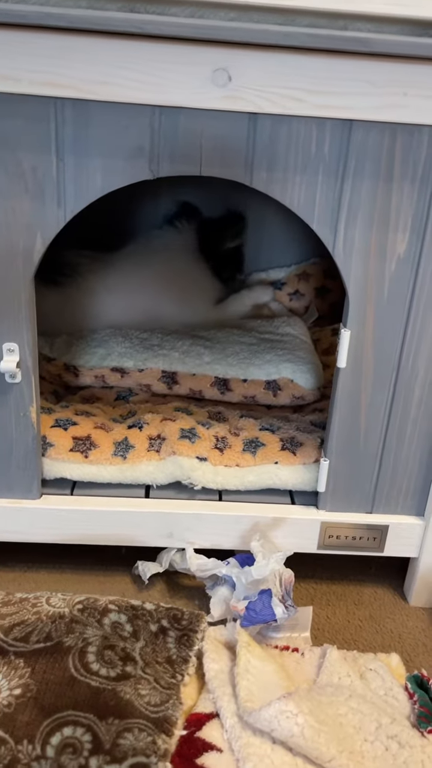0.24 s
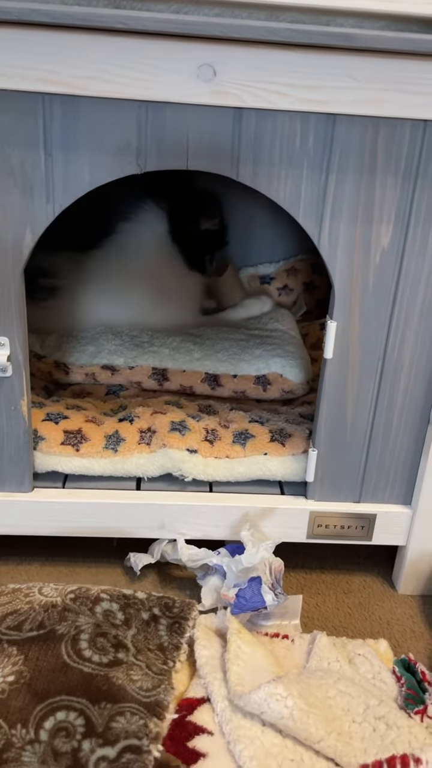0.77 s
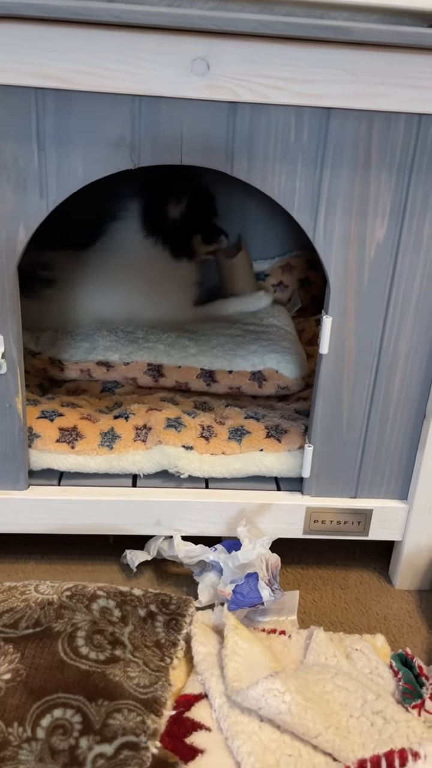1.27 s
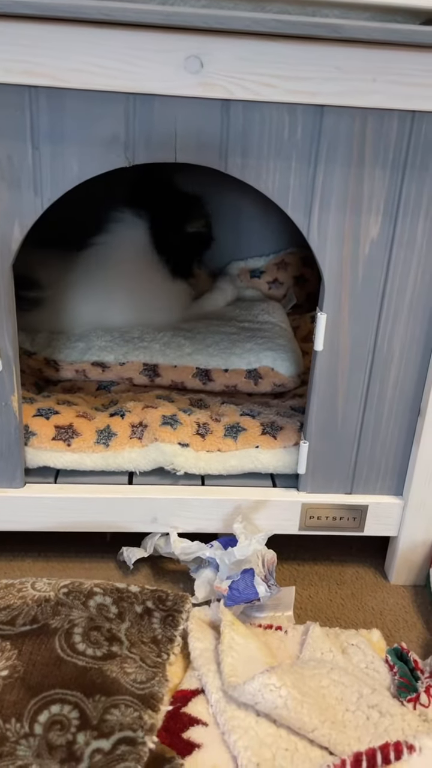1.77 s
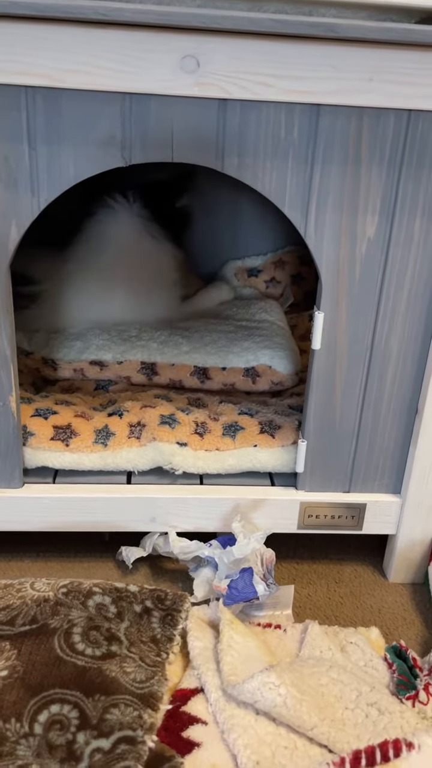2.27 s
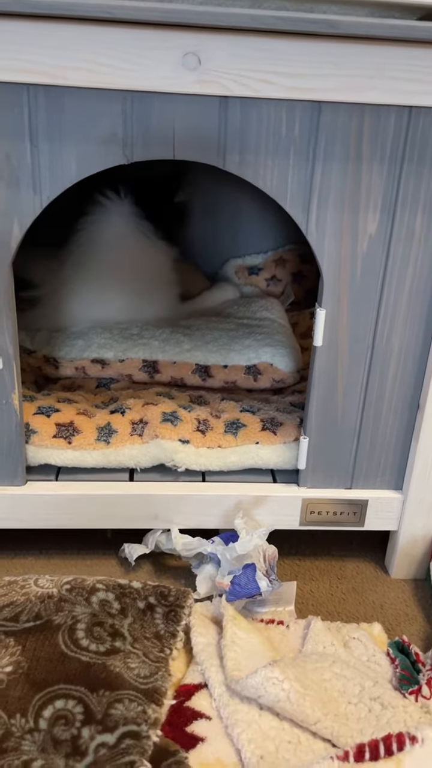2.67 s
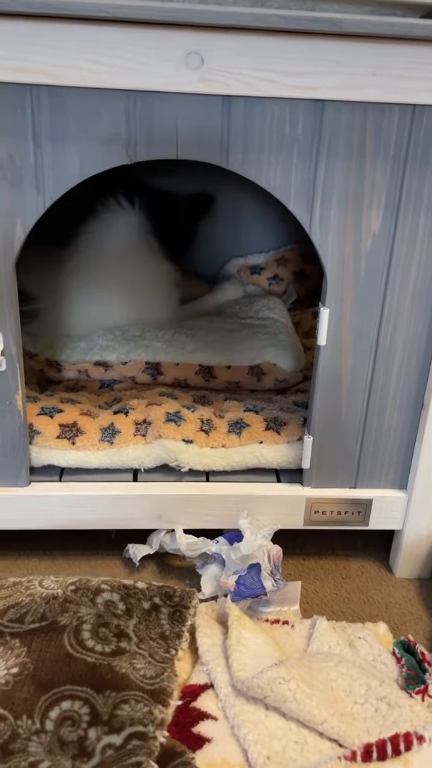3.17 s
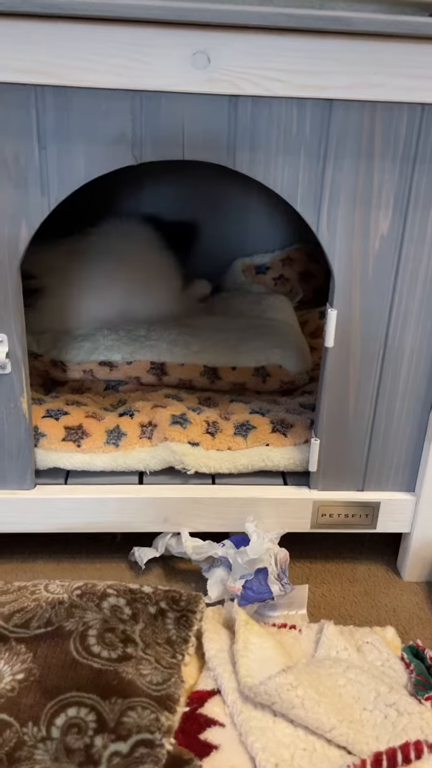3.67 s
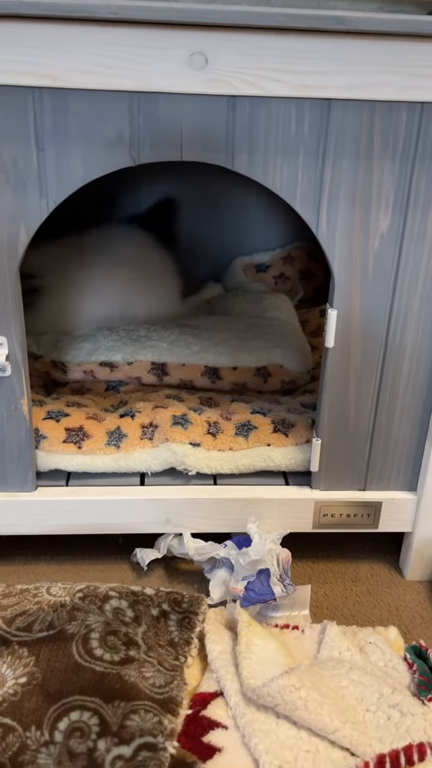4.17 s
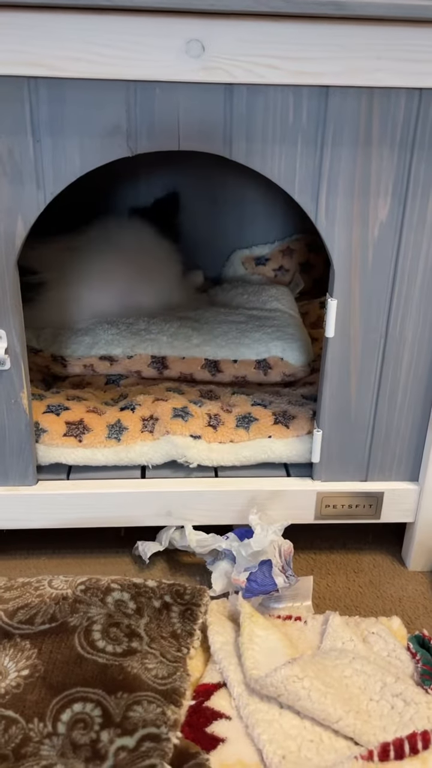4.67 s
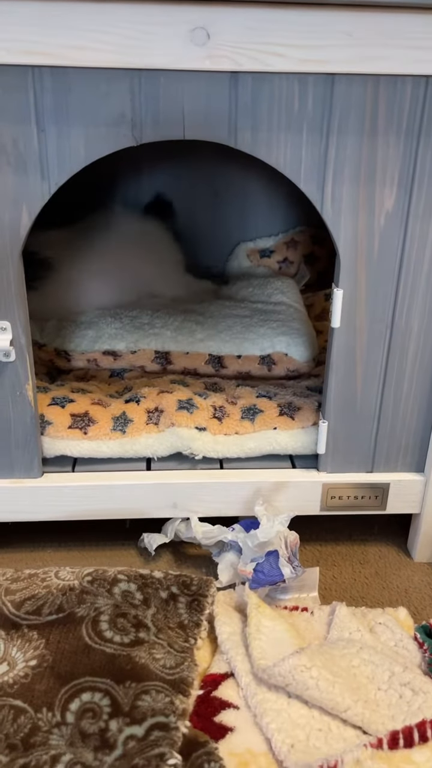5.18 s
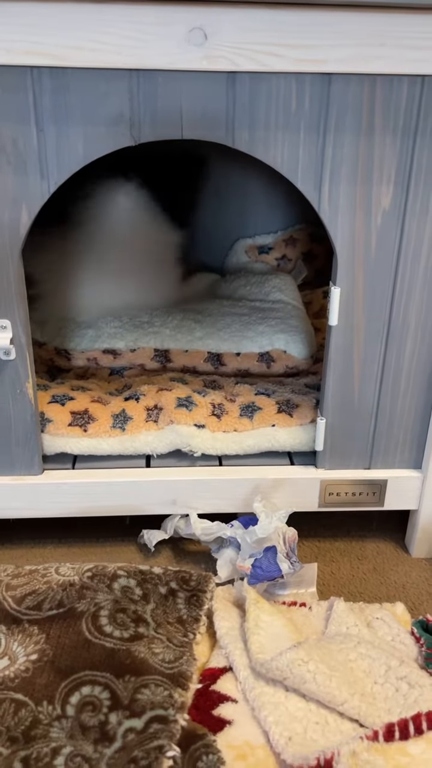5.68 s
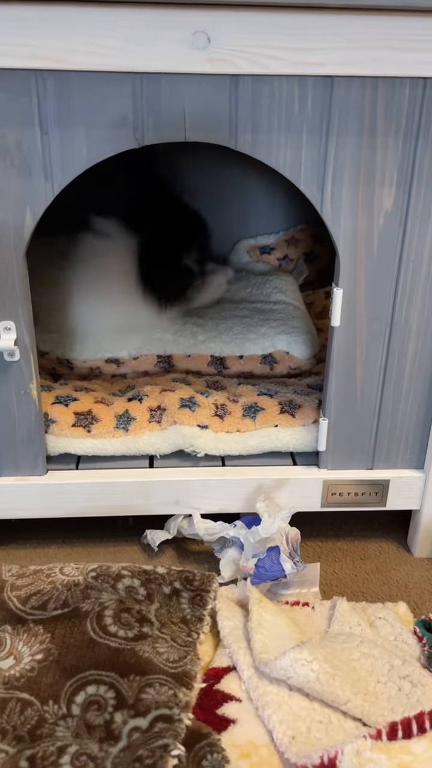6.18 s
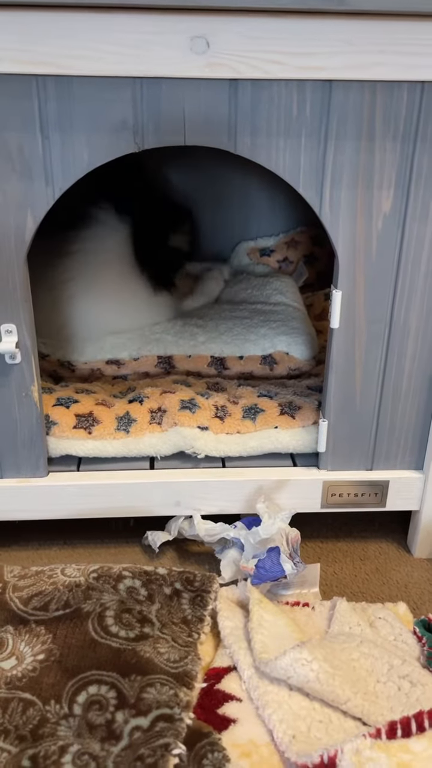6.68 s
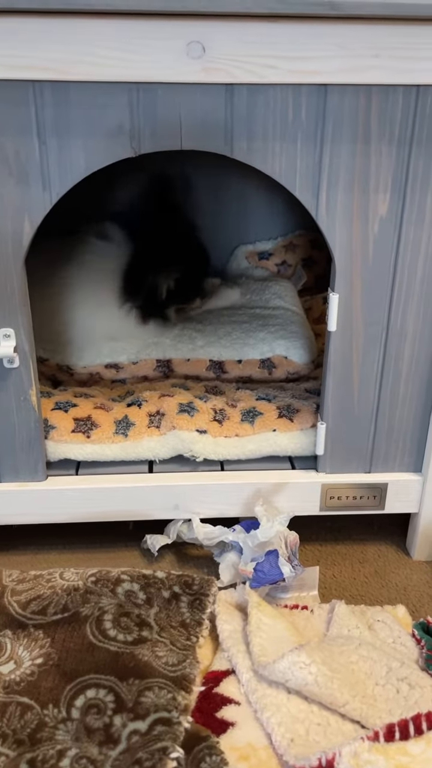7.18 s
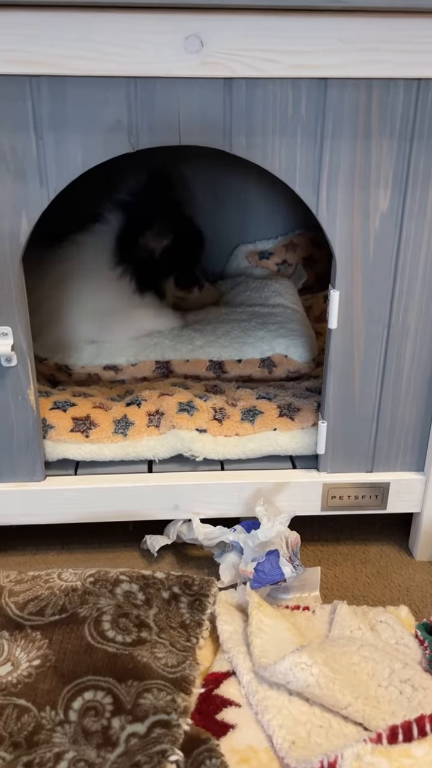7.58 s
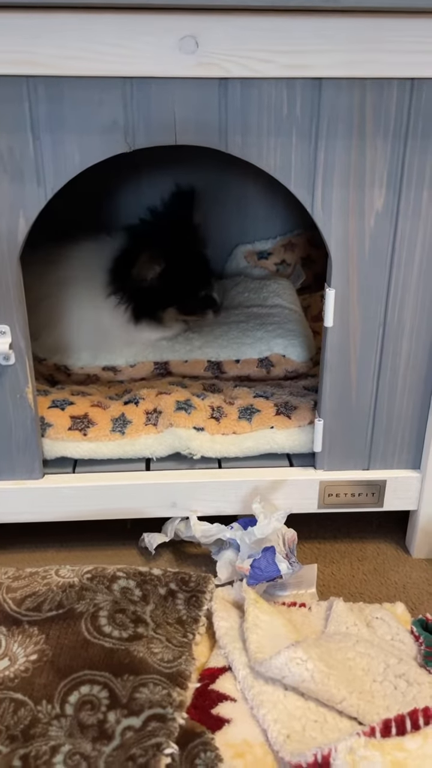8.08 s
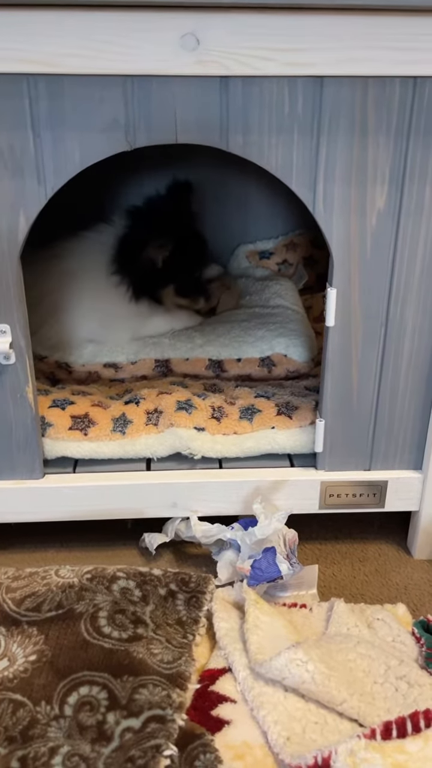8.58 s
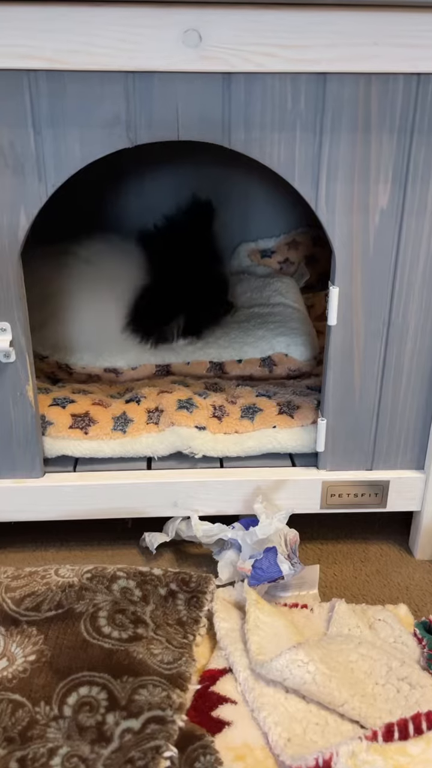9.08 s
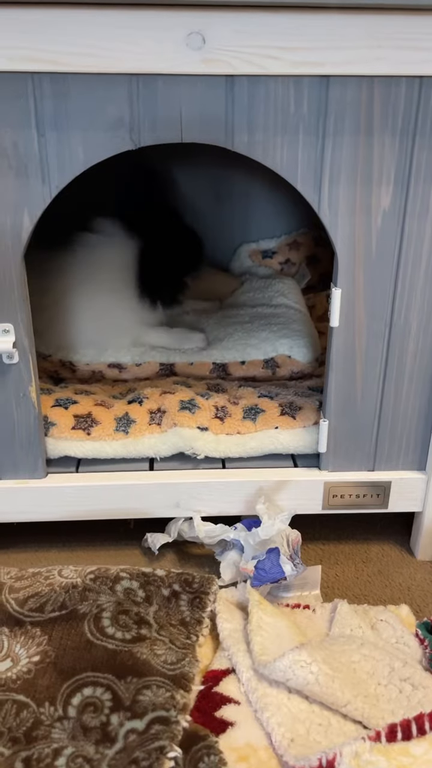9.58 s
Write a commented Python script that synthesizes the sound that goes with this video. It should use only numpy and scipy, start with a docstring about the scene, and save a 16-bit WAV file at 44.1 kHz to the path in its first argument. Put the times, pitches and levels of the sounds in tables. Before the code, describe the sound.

Dry crinkling, tearing and crunching come in irregular bursts as a small dog bites through a cardboard tube in a wooden kennel indoors. After a short lull the snaps grow more frequent, joined by soft low thuds from its body, a brief bump of a hand on the microphone and a couple of very faint squeaks. The sound is fairly close, over a steady low hum.

```python
"""A small dog chews a cardboard tube, lying on cushions in a wooden kennel a metre from a phone.
Paper fibres tear in dense crackle, teeth snap through the wall and the air in the tube rings.
The body thuds against the boards, something squeaks faintly, a hand briefly bumps the phone.
The room rumbles under a mains hum. Stereo: the phone's two microphone ports."""
import sys
import numpy as np
from scipy import signal
from scipy.fft import rfft, irfft, next_fast_len
from scipy.io import wavfile
from scipy.ndimage import uniform_filter1d

SR = 44100
rng = np.random.default_rng(int(sys.argv[2]) if len(sys.argv) > 2 else 0)


def dump_mix(stems):
    """Bounce the given channels to the path in sys.argv[1] as a 16-bit WAV at rate SR."""
    frames = np.atleast_2d(stems).T  # one column per channel
    limited = np.clip(frames, -1, 1)  # hard clip at full scale
    pcm = np.round(limited * 32767).astype(np.int16)
    wavfile.write(sys.argv[1], SR, pcm)


N = 433944

# spectrum of dry flakes breaking: f/Hz, level/dB
FLAKE_SPECTRUM = [(8000, -22.5), (9300, -3), (11000, 0.5), (12000, -8), (13000, -53.5), (15000, -40)]
ANTIPHASE = np.array([[1], [-1]])  # left, right


def undb(db):
    return 10 ** (np.asarray(db) / 20)


def level(x, rms_db=0):
    return x * undb(rms_db) / np.sqrt(np.mean(x ** 2))


def colour(x, points):
    """Minimum-phase filter through (f/Hz, gain/dB) points; falls 30 dB past the ends."""
    hz, db = np.transpose(points)
    log_grid = np.log(np.maximum(np.fft.rfftfreq(4096, 1 / SR), 1))
    log_hz = np.log(np.r_[hz[0] / 4, hz, hz[-1] * 1.3])
    gain_db = np.interp(log_grid, log_hz, np.r_[db[0] - 30, db, db[-1] - 30])
    cepstrum = irfft(np.log(undb(gain_db)))
    cepstrum[1:2048] *= 2
    cepstrum[2049:] = 0
    return signal.fftconvolve(x, irfft(np.exp(rfft(cepstrum))))[:len(x)]


def ring(x, hz, t60_s):
    """One decaying mode, driven by x."""
    pole = np.exp(2j * np.pi * hz / SR - np.log(1000) / (t60_s * SR))
    return signal.lfilter([1], [1, -pole], x).imag


def walk(rate_hz):
    """Random steps, smoothed twice."""
    hold = int(SR / rate_hz)
    steps = np.repeat(rng.standard_normal(N // hold + 1), hold)
    return 2.02 * uniform_filter1d(uniform_filter1d(steps, hold), hold)[:N]


def room():
    """Low rumble of the house, nearly alike at both ports, and a wavering mains hum."""
    # rumble spectrum: f/Hz, level/dB
    rumble_spectrum = [(30, -21), (42, -4.5), (60, 2.5), (100, -5), (160, -13.5), (250, -22.5),
                       (400, -24.5), (700, -36.5), (1500, -44.5), (3000, -59.5), (7000, -60.5),
                       (11000, -85), (13000, -66.5)]
    # mains harmonics: f/Hz, rms level/dB
    harmonics = [(60, -59.5), (120, -59.5), (180, -74)]
    mid, side = (level(colour(rng.standard_normal(N), rumble_spectrum), -54) for _ in range(2))
    side = signal.sosfilt(signal.butter(2, 260, "high", fs=SR, output="sos"), side) * undb(-3.5)
    t = np.arange(N) / SR
    hum = sum(np.sqrt(2) * undb(db + 1.13 * walk(13)) * np.sin(2 * np.pi * hz * t + 0.32 * walk(9.7))
              for hz, db in harmonics)
    return mid + hum + (side + undb(-35) * hum) * ANTIPHASE


def pulls():
    """Gains of wall, skin, flakes and tube: each pull rises, holds and fades over steady rubbing."""
    # pulls of the teeth: t/s, hold/s, wall level/dB, then re wall: skin/dB, tube/dB, flakes/dB
    tears = [(0.041, 0.091, -70, -0.5, 2, -2.5), (0.1, 0.4, -74.5, -12, 0.5, -7),
             (0.102, 0.063, -60, -27, 1.5, -13), (0.307, 0.18, -71.5, 2, -10, 6.5),
             (0.295, 0.027, -70.5, -3, 11, -8), (0.382, 0.057, -68, 8.5, -16, 10.5),
             (0.543, 0.04, -74, 2.5, -12, 11.5), (0.7, 0.12, -86, -16, 7, -2),
             (0.871, 0.053, -76.5, 1.5, -15, 1), (0.898, 0.24, -72.5, -15, 2, -14),
             (0.947, 0.014, -78.5, 8.5, -3, 11), (1, 0.0055, -64.5, 4, 4.5, 4),
             (1.06, 0.067, -75.5, -9, 1, -14), (1.242, 0.0046, -59, -2.5, -6, -2),
             (1.282, 0.0057, -67.5, 3, 6, -4), (1.166, 0.03, -64.5, 3.5, 0, 7.5),
             (1.17, 0.24, -89, -1, 1, -2), (1.339, 0.04, -63, 1, -7, -0.5), (1.372, 0.086, -74.5, 0, 0, 2),
             (1.576, 0.0083, -59, 5.5, -1, 7), (1.577, 0.1, -70.5, -7, 11, -3),
             (1.634, 0.024, -57.5, -0.5, 1.5, 5), (1.73, 0.13, -83, 0, -8, 1.5),
             (1.82, 0.01, -78, 5.5, -5, 4), (2.046, 0.011, -69.5, -12, 15, -15),
             (2.047, 0.18, -81.5, -4, -4, -2.5), (2.288, 0.011, -81, -6, -12, -12),
             (2.709, 0.061, -84, 0.5, -1, 3.5), (2.862, 0.23, -78.5, -7, 2, -4),
             (2.988, 0.043, -78, -3.5, -11, -2), (3.258, 0.12, -68, -3.5, -7, -0.5),
             (3.421, 0.061, -68, 0, 14, -2.5), (3.542, 0.057, -65, -4, 11, -12),
             (3.572, 0.22, -76.5, -16, 0, -8), (3.698, 0.037, -75.5, 0, 15, 0),
             (4.034, 0.29, -82.5, -2, 4.5, -4), (4.042, 0.011, -77.5, 6, 14.5, 10),
             (4.304, 0.11, -66, -3.5, 1.5, -8), (4.416, 0.054, -80, 0, 10, -2),
             (4.553, 0.11, -71.5, 1, -4, 1), (4.585, 0.18, -71.5, 0, 6.5, -8),
             (4.823, 0.13, -71.5, -2, 4.5, 0.5), (5.041, 0.04, -64, 1, -8, -4),
             (4.897, 0.31, -73.5, -1, 7, -6), (5.067, 0.024, -52, -3.5, 0, -1),
             (5.1, 0.26, -76.5, -2.5, 10, -5), (5.302, 0.024, -69, -4.5, 2, -7),
             (5.434, 0.054, -84.5, -1, 7, 2), (5.515, 0.069, -63.5, 4, 8.5, 7.5),
             (5.611, 0.2, -65, -1.5, 7.5, 6), (5.717, 0.2, -69, -4, 2.5, -10), (5.75, 0.27, -74, 2, -3, -4),
             (5.855, 0.32, -86, 4, -5, 13), (6.106, 0.29, -73, -4, 5.5, -5),
             (6.132, 0.036, -55.5, 2.5, -8, 10), (6.189, 0.027, -53, -2, -11, 2),
             (6.237, 0.039, -59, -2.5, -11, -5), (6.33, 0.24, -72, -3.5, -4, -6),
             (6.425, 0.0089, -64, 0, 6, 7.5), (6.452, 0.019, -66.5, 0.5, 4, -13),
             (6.64, 0.039, -72, 3, -13, 5), (6.695, 0.19, -76, -7.5, 2.5, -6),
             (6.838, 0.034, -74.5, 2, -17, 9.5), (6.947, 0.0088, -75, 13, -8, 18.5),
             (6.953, 0.21, -72.5, -5, 2, -2), (7.036, 0.39, -77.5, -9, -1, -4),
             (7.05, 0.019, -68.5, 1.5, -6, 4), (7.274, 0.065, -70.5, 9, -18, 10),
             (7.315, 0.16, -81.5, -16, 5, -10), (7.346, 0.024, -65.5, -7, 13.5, -20),
             (7.523, 0.012, -89, -4, -2, 14), (7.652, 0.18, -77, -3, 3, -2),
             (7.74, 0.012, -62, 3.5, 2.5, 6.5), (7.815, 0.009, -70, 7, -10, 10),
             (7.96, 0.36, -76, -3, -5, -8), (8.04, 0.18, -72, 1.5, -13, 1),
             (8.145, 0.25, -73, -2.5, 0, -13), (8.162, 0.072, -70.5, 11, 5, 15.5),
             (8.347, 0.038, -73.5, -1, 8.5, 6.5), (8.47, 0.22, -75.5, 0, -1, 3),
             (8.497, 0.032, -61.5, 1.5, -5.5, 4), (8.803, 0.03, -61.5, -1.5, 2.5, -1),
             (8.866, 0.056, -56, 3.5, -11, 3), (8.89, 0.033, -49, -3.5, -4, 0.5),
             (8.98, 0.14, -72.5, -3, 8, -3), (9.098, 0.21, -71.5, 1.5, 7, -0.5),
             (9.143, 0.0085, -52, -6, 1, -4), (9.334, 0.28, -76.5, 3, 0, 8), (9.435, 0.15, -70, 0.5, 5, 0),
             (9.544, 0.22, -68, -5, -1, -12), (9.598, 0.022, -61, 1.5, -19, -0.5),
             (9.746, 0.14, -69.5, 0, 2.5, -1.5)]
    rise_db_per_s, fall_db_per_s, rub_db = 819, 501, -90.5
    t = np.arange(0, N + 64, 64) / SR
    start_s, hold_s, wall_db, skin_db, tube_db, flakes_db = np.transpose(tears)[:, :, None]
    ramps_db = np.minimum((t - start_s) * rise_db_per_s, (start_s + hold_s - t) * fall_db_per_s)
    pull_db = wall_db + np.minimum(0, ramps_db)
    gains = []
    for layer_db, rub_offset_db in ((0, 0), (skin_db, -0.5), (flakes_db, -0.5), (tube_db, -15)):
        power = np.sum(undb(pull_db + layer_db) ** 2, axis=0) + undb(rub_db + rub_offset_db) ** 2
        gains.append(np.interp(np.arange(N) / SR, t, np.sqrt(power)))
    return np.array(gains)


def fibres(per_s, spread_db, hiss_db, tail_s):
    """Fibres break at random, few of them strongly, each with a short noisy tail over a rubbing hiss."""
    breaks = (rng.random(N) < per_s / SR) * undb(spread_db * np.minimum(rng.exponential(size=N), 4))
    swell = signal.lfilter([1], [1, -np.exp(-1 / (tail_s * SR))], breaks)
    return (level(swell) + undb(hiss_db)) * rng.standard_normal(N)


def patches(x, low_hz, bands, depth_db, rate_hz):
    """A bent sheet rings now here, now there: third-octave bands swell and fade independently."""
    out = np.zeros(N)
    for k in range(bands):
        edges_hz = low_hz * 2 ** (k / 3 + np.array([-1, 1]) / 6)
        band = signal.sosfilt(signal.butter(2, edges_hz, "band", fs=SR, output="sos"), x)
        out += (-1) ** k * band * undb(depth_db * walk(rate_hz))
    return level(out)


def tube(x, grip_hz, falloff_db_per_oct, detune=0):
    """Tube modes, neighbours in opposite phase; the grip damps those far from one pitch."""
    # air column and wall modes: f/Hz, level/dB, t60/s
    modes = [(237, 1, 0.051), (328.4, -6, 0.09), (385.7, -8, 0.065), (558.2, -4, 0.047), (660, -10, 0.063),
             (830.7, -2.5, 0.047), (940, -9, 0.056), (1053.6, -6, 0.053), (1233, -10, 0.064),
             (1564, -8, 0.055)]
    tuning = np.ones(len(modes)) + detune
    out = np.zeros(len(x))
    for k, (hz, db, t60_s) in enumerate(modes):
        drive = x * undb(db - falloff_db_per_oct * np.abs(np.log2(hz / grip_hz)))
        out += (-1) ** k * ring(drive, hz * tuning[k], t60_s) / np.sqrt(t60_s)
    return out


def creases(low_hz, high_hz):
    """Small panels buckle at random, each ringing briefly at its own sliding pitch."""
    per_s, decay_cycles, spread_db, span = 300, 8, 2.5, 700
    when, pitch, size, slide = rng.random((3000, 4))[:int(per_s * N / SR)].T[:, :, None]
    t = np.arange(span) / SR
    cycles = low_hz * (high_hz / low_hz) ** pitch * t
    envelope = cycles * np.exp(-cycles / decay_cycles) * (1 - np.arange(span) / span)
    gain = undb(-spread_db * np.log(np.maximum(size, 0.02)))
    grains = gain * envelope * np.sin(2 * np.pi * cycles * (1 + 6.7 * (slide - 0.5) * t))
    index = (when * N).astype(int) + np.arange(span)
    return level(np.bincount(index.ravel(), grains.ravel(), N + span)[:N], -6)


def tearing():
    """Crackle of the thick wall, its peeling paper skin and dry flakes, also heard through the tube."""
    # card wall spectrum: f/Hz, level/dB
    wall_spectrum = [(900, -14), (1400, 2.5), (1900, -0.5), (3000, 4.5), (4300, -8), (5200, -12.5)]
    # paper skin spectrum: f/Hz, level/dB
    skin_spectrum = [(4200, -0.5), (5300, 2), (8500, 3.5), (9500, -16)]
    # ring pitch favoured by the grip of the jaws: t/s, f/Hz
    grip = [(0, 1070), (1.05, 1180), (1.25, 410), (2.9, 430), (3.3, 640), (6.45, 640), (6.66, 1240),
            (6.8, 1230), (6.83, 400), (6.95, 685), (7.1, 670), (7.14, 377), (7.5, 370), (8.7, 654)]
    wall_gain, skin_gain, flake_gain, tube_gain = pulls() * undb(0.83 * walk(15))  # uneven jaws
    fine = fibres(per_s=320, spread_db=3.2, hiss_db=2, tail_s=0.0018) * undb(1.8 * walk(40))
    coarse = fibres(per_s=92, spread_db=2, hiss_db=-3.5, tail_s=0.0017)
    wall = patches(colour(fine, wall_spectrum), low_hz=1000, bands=8, depth_db=3, rate_hz=30)
    decorrelated = fine * rng.choice([-1, 1], N)
    skin = patches(colour(decorrelated, skin_spectrum), low_hz=3730, bands=4, depth_db=2, rate_hz=31)
    flakes = patches(colour(fine, FLAKE_SPECTRUM), low_hz=10750, bands=3, depth_db=2, rate_hz=34)
    grip_hz = np.interp(np.arange(N) / SR, *np.transpose(grip))
    hollow = tube(coarse, grip_hz, falloff_db_per_oct=11.5)
    hollow /= np.sqrt(uniform_filter1d(hollow ** 2, size=SR // 2))  # grip moves pitch, not strength
    wall += creases(1088, 4315)
    skin += creases(4007, 7800)
    return wall_gain * wall + skin_gain * skin + flake_gain * flakes + tube_gain * hollow


def snaps():
    """Each bite is a noise burst of milliseconds, coloured by the card, and a knock on the tube."""
    # teeth through the card: t/s, level/dB, crack f/Hz, relative ring/dB, ring f/Hz, relative crisp/dB
    bites = [(0.1021, -33.5, 2660, 0, 1140, -58), (0.2162, -42, 3800, -10, 1180, -7.5),
             (0.219, -44, 6500, -13, 1180, -3), (0.285, -49, 1310, -4.5, 1090, -15),
             (0.427, -50, 2360, -7, 353, -19), (0.449, -48.5, 1430, 6, 495, -26),
             (0.484, -41.5, 2380, -5.5, 410, -12), (0.529, -54.5, 2300, 0.5, 930, -27),
             (0.6943, -59.5, 2140, -21, 388, -70), (0.7765, -69, 1340, 13, 1110, -29),
             (0.9493, -51, 6800, -4, 358, -20), (0.974, -58, 1670, 9, 1050, -21),
             (1.1886, -45.5, 2320, -6, 390, -14), (1.154, -52, 3000, -1.5, 347, -13),
             (1.2557, -37.5, 2160, -8.5, 393, -10), (1.3148, -53, 2250, -12, 361, -25),
             (1.3656, -40.5, 2700, 0, 390, -38), (1.3955, -46.5, 5700, -23, 447, -5),
             (1.4455, -51.5, 2840, -10, 385, -29), (1.565, -48, 2910, -30, 388, -8),
             (1.584, -37.5, 2900, -3, 750, -4), (1.6267, -60, 2350, -1, 580, -6),
             (1.6399, -34.5, 6100, -9.5, 880, -9.5), (1.7336, -69, 1630, 13, 830, -22),
             (2.038, -52.5, 3300, 2.5, 830, -25), (2.294, -60, 4600, -18, 380, -17),
             (2.731, -56.5, 4500, -8, 377, -6), (3.2053, -54.5, 2300, -28, 412, -46),
             (3.2456, -52, 2300, -17, 1210, -1.5), (3.2905, -42.5, 4000, -22, 912, -13),
             (3.303, -54, 2470, -18, 912, -43), (3.3412, -55, 2160, 8, 870, -24),
             (3.3707, -50.5, 2190, 7, 575, -16), (3.4203, -57, 1450, 17, 557, -18),
             (3.4638, -55, 1650, -1, 850, -17), (3.5256, -46.5, 3120, 7.5, 880, -11),
             (3.541, -33, 2800, 3, 820, -20), (3.5524, -38, 2610, 7, 493, -15),
             (3.5615, -34.5, 2740, 4.5, 910, -16.5), (3.5905, -45, 1640, -8, 860, -29),
             (3.617, -53, 1480, 1, 870, -16), (3.69, -46, 2760, 3, 630, -12),
             (3.7056, -50.5, 1450, 7, 850, -48), (3.831, -61.5, 2770, 8, 600, -49),
             (4.154, -65, 1400, 12.5, 630, -14), (4.185, -59.5, 2000, 2, 644, -21),
             (4.4018, -43, 5800, 1, 830, -15), (4.5403, -28.5, 6000, -10, 795, -14.5),
             (4.568, -38.5, 1680, 2.5, 480, -23), (4.5892, -41, 1450, 4.5, 810, -13),
             (4.764, -56.5, 1540, 14.5, 870, -35), (4.935, -46.5, 2400, -3, 700, -13),
             (5.0715, -40.5, 1350, 4.5, 630, -26), (5.1015, -25.5, 1980, 1.5, 780, -12.5),
             (5.1838, -42, 1300, 3, 770, -9), (5.241, -57.5, 2000, 11, 485, -29),
             (5.3084, -48.5, 5740, 5.5, 800, -16), (5.5119, -51, 6080, -10, 650, -3),
             (5.6073, -42.5, 5840, 7, 855, -11), (5.6126, -32.5, 2540, 8.5, 780, -5),
             (5.618, -37.5, 2560, 7, 830, -12), (5.6255, -38.5, 2300, 6, 830, -6),
             (5.671, -48, 2280, 9.5, 810, -30), (5.691, -45.5, 1540, 9, 874, -31),
             (5.7216, -43.5, 1690, 6.5, 856, -30), (5.738, -27, 1450, -12.5, 366, -9.5),
             (5.781, -38, 2130, 2.5, 870, -13.5), (5.8015, -43.5, 2800, 4.5, 427, -8),
             (5.85, -43, 1620, -5, 363, -17), (5.9228, -49.5, 6360, -1, 366, -15),
             (5.955, -53.5, 1420, 6.5, 375, -21), (5.976, -48, 6830, 3, 356, -7),
             (6.098, -52.5, 1320, 3, 398, -28), (6.124, -41, 1400, -22, 840, -13),
             (6.1725, -51, 5300, -9, 800, -12), (6.1865, -34.5, 1440, 0.5, 755, -16),
             (6.1934, -37.5, 1570, 6.5, 750, -7), (6.2714, -46, 2780, -5, 380, -12),
             (6.319, -59, 3000, -15, 800, -12), (6.3338, -44.5, 2470, 0.5, 800, -23),
             (6.341, -51, 2900, -2, 830, -15), (6.43, -49, 2250, 1, 386, -10),
             (6.809, -56.5, 1310, 10, 383, -31), (6.995, -64, 2500, 5, 716, -25),
             (7.021, -61, 2500, 8, 690, -25), (7.308, -44, 5500, -34, 498, -10),
             (7.347, -38.5, 2460, -0.5, 426, -26), (7.6523, -67, 3700, -14, 400, -10),
             (7.688, -54, 2680, -7, 360, -9), (7.711, -52, 6500, -10, 500, -7),
             (7.719, -54, 5500, -3, 603, -8), (7.7514, -42, 3020, -6.5, 604, -5.5),
             (7.9397, -50, 3730, -32, 377, -22), (8.032, -44.5, 1610, -26, 382, -11.5),
             (8.157, -54, 6600, 0, 596, -21), (8.501, -51, 2980, -18, 686, -15),
             (8.5441, -28, 3960, -25, 805, -4.5), (8.648, -49.5, 3780, -20, 377, -3),
             (8.665, -44, 3860, -33, 393, -2), (8.7832, -39, 2980, -15, 610, -12),
             (8.8732, -42, 2470, -21, 727, -6), (8.9014, -31, 3950, -3, 870, -16),
             (8.922, -37, 2200, -15, 850, -7), (8.9385, -38, 2940, 1, 590, 0.5),
             (8.987, -41.5, 2670, 0, 630, -16), (9.096, -58.5, 2120, 16.5, 656, -29),
             (9.115, -40, 1550, -19, 525, -18), (9.1431, -37.5, 2590, -20, 549, -27),
             (9.434, -54, 1560, -4, 389.5, -5), (9.5181, -31, 2620, -10, 373, -25),
             (9.541, -47, 1410, 6.5, 625, -11), (9.5718, -50, 2960, -26, 802, -4),
             (9.6273, -44.5, 1600, 1.5, 630, -11)]
    attack_s, contact_s, grit, span = 0.00081, 0.00012, 0.15, SR // 12
    out, t = np.zeros(N + span), np.arange(span) / SR
    for start_s, db, hz, ring_db, ring_hz, crisp_db in bites:
        noise = rng.standard_normal(span)
        t60_s = np.clip(0.019 * np.exp(0.2 * noise[-1]), 0.004, 0.2)
        burst = noise * np.exp(-np.log(1000) * t / t60_s) * np.minimum(t / attack_s, 1)
        spectrum = [(hz / 3.5, -13), (hz / 1.25, -4), (hz, 0), (hz * 1.2, -4),
                    (max(hz * 1.4, 9500), crisp_db)]
        crack = colour(burst, spectrum)
        flakes = colour(burst, FLAKE_SPECTRUM)
        knock = np.sign(noise[0]) * t / contact_s * np.exp(1 - t / contact_s) + grit * burst
        hollow = tube(knock, ring_hz, falloff_db_per_oct=23, detune=0.026 * noise[-12:-2])
        i = int(start_s * SR)
        for part, part_db in ((crack, 1.5), (flakes, crisp_db + 7), (hollow, ring_db - 0.5)):
            out[i:i + span] += undb(db + part_db) * part / np.abs(part).max()
    return out[:N]


def soft_blows(blows):
    """A soft push of about a cycle and a half rings a main mode and three neighbours."""
    modes = ((1.07, 17), (0.68, -12), (1.46, 9.5), (1.7, 6.5))  # frequency ratio, level/dB
    span = SR // 2
    out = np.zeros(N + span)
    for start_s, peak_db, hz, t60_s in blows:
        cycles = np.arange(span) * hz / SR
        push = np.sin(np.pi * np.minimum(cycles / 1.42, 1)) ** 2 * np.cos(2 * np.pi * cycles)
        blow = sum(undb(db) * ring(push, hz * ratio, t60_s) for ratio, db in modes)
        i = int(start_s * SR)
        out[i:i + span] += undb(peak_db) * blow / np.abs(blow).max()
    return out[:N]


def body_thuds():
    """The cushion gives and springs back, the boards ring; the right port hears it first."""
    # body against cushion and boards: t/s, peak level/dB, push f/Hz, t60/s
    thuds = [(0.968, -44.5, 207, 0.094), (2.505, -56.5, 258, 0.032), (2.569, -50.5, 263, 0.021),
             (2.676, -46, 87, 0.14), (2.693, -48.5, 235, 0.05), (2.18, -49, 131, 0.08),
             (2.861, -43.5, 117, 0.23), (3.078, -40.5, 119, 0.11), (3.441, -28.5, 86, 0.16),
             (3.558, -33, 92.8, 0.26), (4.786, -43, 117, 0.14), (4.894, -20.5, 116.3, 0.14),
             (5.252, -37.5, 81.8, 0.24), (6.185, -44.5, 245, 0.091), (7.351, -35, 131, 0.29),
             (7.353, -48, 320, 0.14)]
    left_lag_s, left_db = 0.00006, 0.5
    t = np.arange(N) / SR
    right = soft_blows(thuds)
    left = np.interp(t - left_lag_s, t, right) * undb(left_db)
    return np.array([left, right])


def squeaks():
    """Faint thin whistles bend through three pitches; their level flutters."""
    # squeaks: t/s, length/s, level/dB, start f/Hz, middle f/Hz, end f/Hz
    glides = [(2.215, .035, -73, 4900, 5100, 5450), (2.258, .024, -76, 5300, 5050, 4950),
              (4.806, .012, -73, 4300, 4000, 3850), (4.817, .014, -64, 4250, 4350, 4350),
              (4.848, .012, -71, 4100, 4200, 4150), (4.868, .02, -69, 4100, 3900, 4050)]
    out = np.zeros(N)
    for start_s, length_s, db, *path_hz in glides:
        progress = np.arange(int(length_s * SR)) / (length_s * SR)
        tone = np.sin(2 * np.pi * np.cumsum(np.interp(progress, [0, 0.5, 1], path_hz)) / SR)
        i = int(start_s * SR)
        out[i:i + len(tone)] = undb(db) * np.sin(np.pi * progress) * tone
    return out * undb(7.4 * walk(300))


def hand_bumps():
    """A hand knocks the phone: low bumps, opposite at the two ports."""
    # hand on phone: t/s, peak level/dB, push f/Hz, t60/s
    bumps = [(3.312, -43, 80, 0.1), (3.342, -48, 80, 0.089), (3.445, -47, 120, 0.05),
             (3.562, -37, 117, 0.1), (3.595, -36, 111, 0.096), (3.672, -39, 101, 0.09)]
    return soft_blows(bumps) * ANTIPHASE


def kennel_tail(x):
    """The walls add a short dull tail, one part alike and one opposite at the ports."""
    # stereo width of the tail: t/s, side level re mid/dB
    width = [(0, 11.5), (0.5, 0), (0.7, 6), (1.1, 7), (1.3, -3), (3.15, 5), (3.25, 4.5), (3.75, 10),
             (3.85, -2), (9.84, 0.5)]
    t60_s, delay_s, tail_db = 0.068, 0.0015, -16
    t = np.arange(SR // 4) / SR
    fade = np.exp(-np.log(1000) * t / t60_s) * (t > delay_s)
    responses = signal.lfilter([1], [1, -0.5], rng.standard_normal((2, len(t)))) * fade
    mid, side = (signal.fftconvolve(x, h / np.sqrt(np.sum(h ** 2)))[:N] for h in responses)
    side_db = np.interp(np.arange(N) / SR, *np.transpose(width))
    return undb(tail_db) * (mid + undb(side_db) * side * ANTIPHASE)


def scene():
    chewing = tearing() + snaps() + squeaks()
    return chewing + kennel_tail(chewing) + body_thuds() + hand_bumps() + room()


def record(dry):
    """The ports hear the treble at different moments and differ in two bands; the top is cut."""
    # lead of left port over right: f/Hz, phase/rad
    port_lead = [(30, 0), (1900, .15), (2800, .8), (3900, .9), (4550, 1.8), (5300, 5), (5750, 6.2),
                 (6200, 6.4), (9600, 9.9), (12200, 12.2), (14600, 13.2)]
    cutoff_hz = 14900
    size = next_fast_len(N + SR)
    hz = np.fft.rfftfreq(size, 1 / SR)
    lead_rad = np.interp(hz, *np.transpose(port_lead))
    # the housing shades the left port
    shade_db = -3 * np.exp(-((hz - 4900) / 500) ** 2) - 1.5 * np.exp(-((hz - 400) / 300) ** 2)
    response = np.exp(0.5j * lead_rad * ANTIPHASE) * undb(0.5 * shade_db * ANTIPHASE)
    ports = irfft(rfft(dry, size) * response, size)[:, :N]
    return signal.sosfilt(signal.ellip(8, 0.2, 70, cutoff_hz, fs=SR, output="sos"), ports)


dry = scene()
out = record(dry)
dump_mix(out)
```